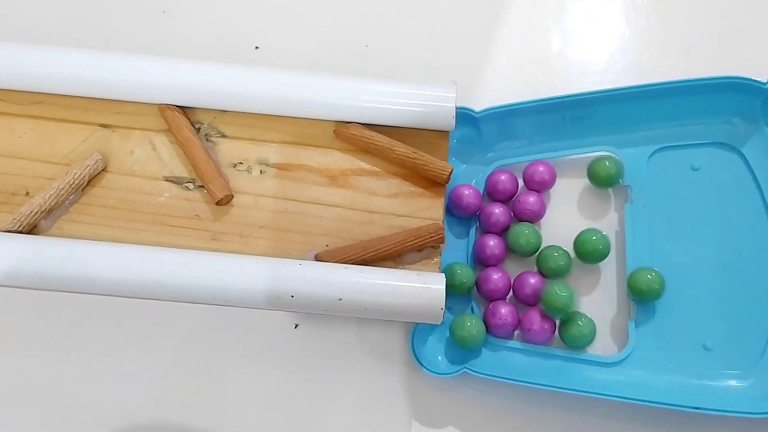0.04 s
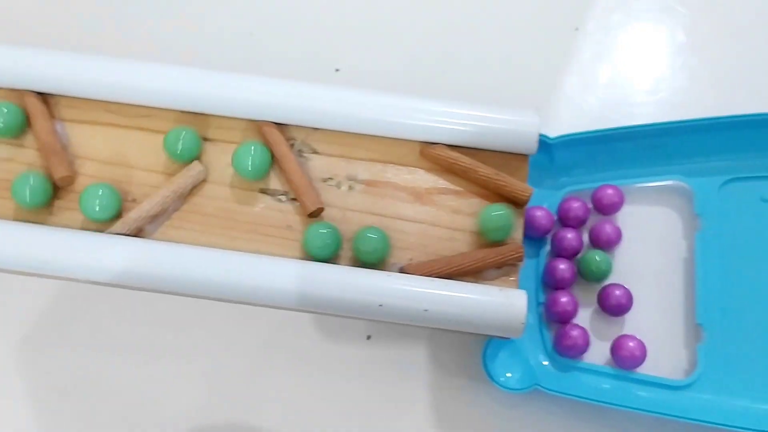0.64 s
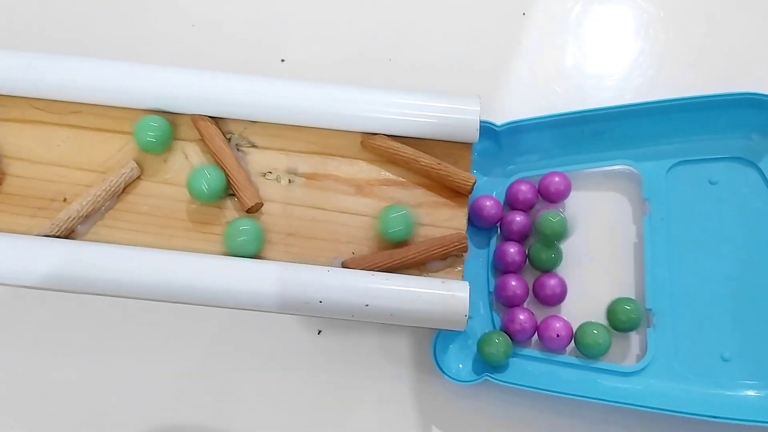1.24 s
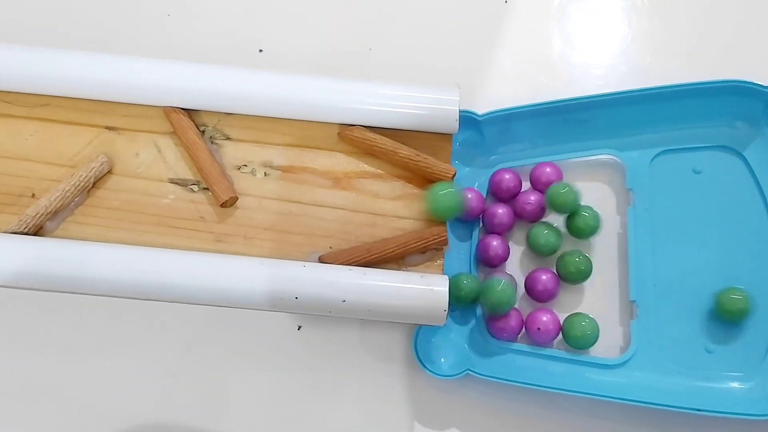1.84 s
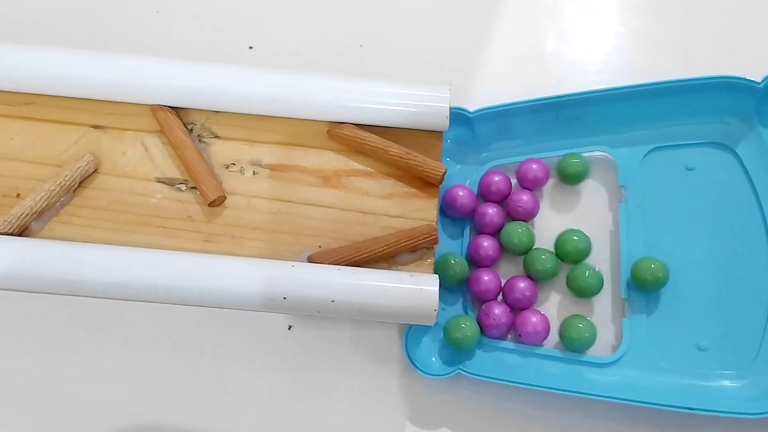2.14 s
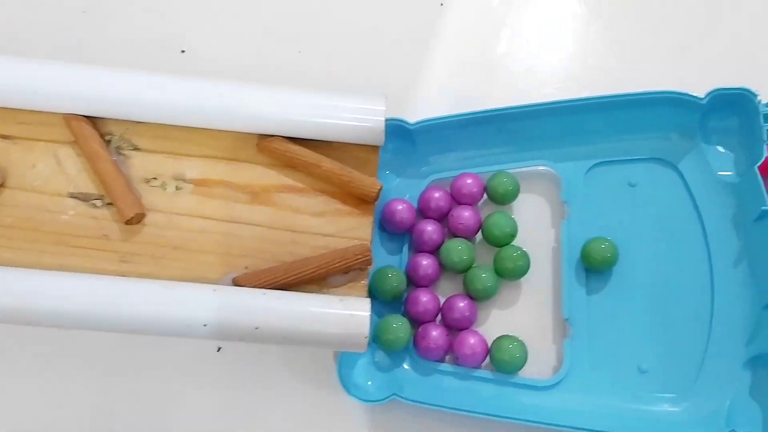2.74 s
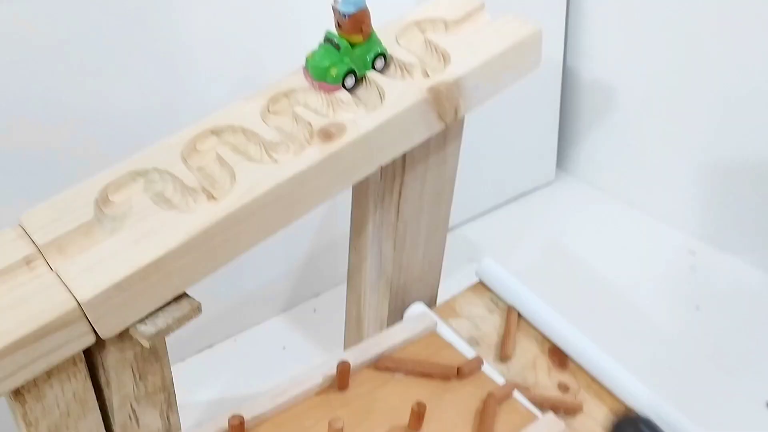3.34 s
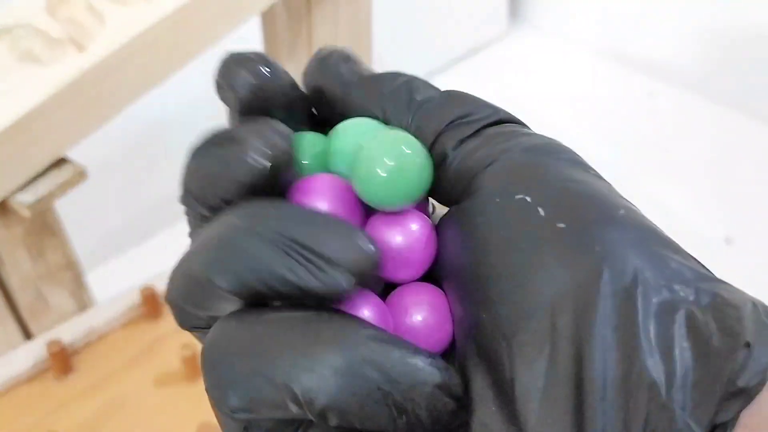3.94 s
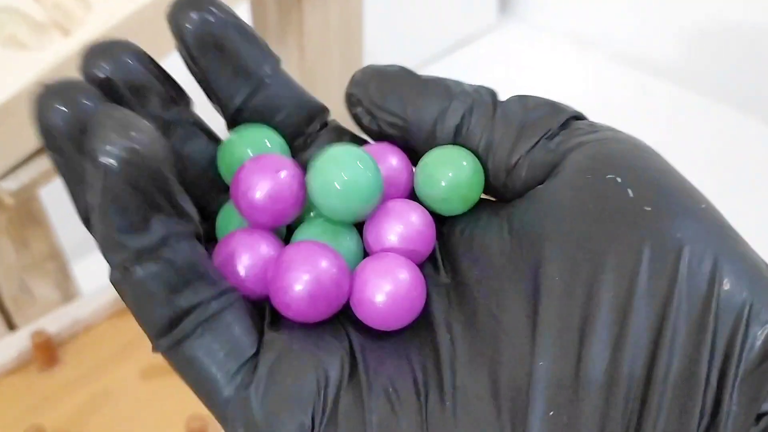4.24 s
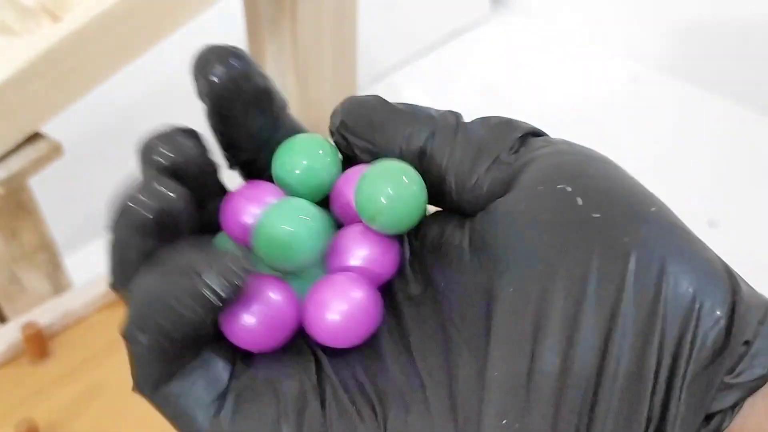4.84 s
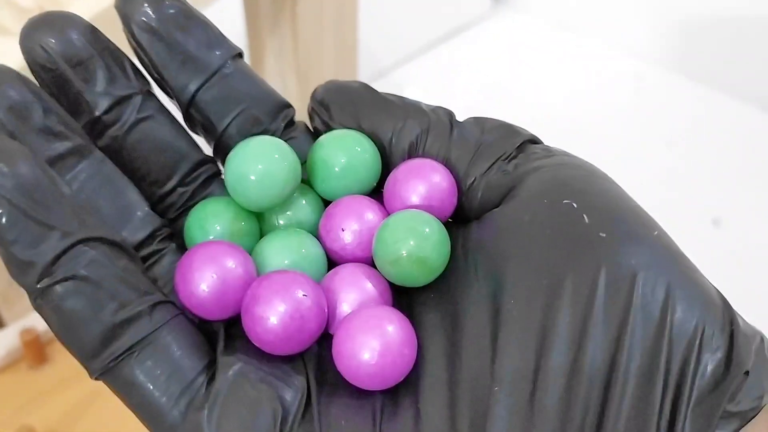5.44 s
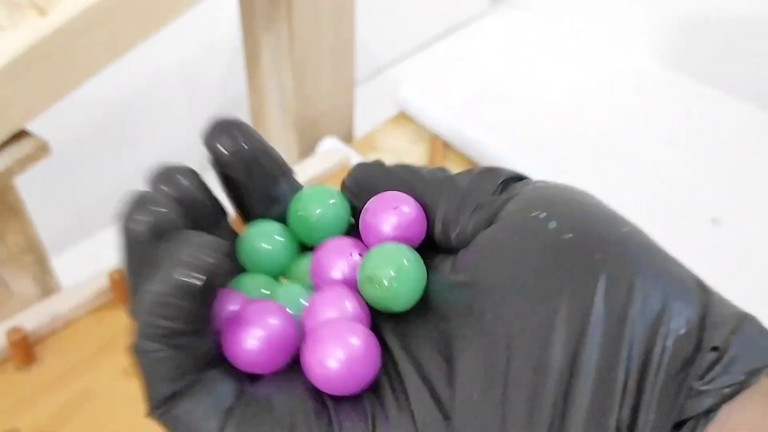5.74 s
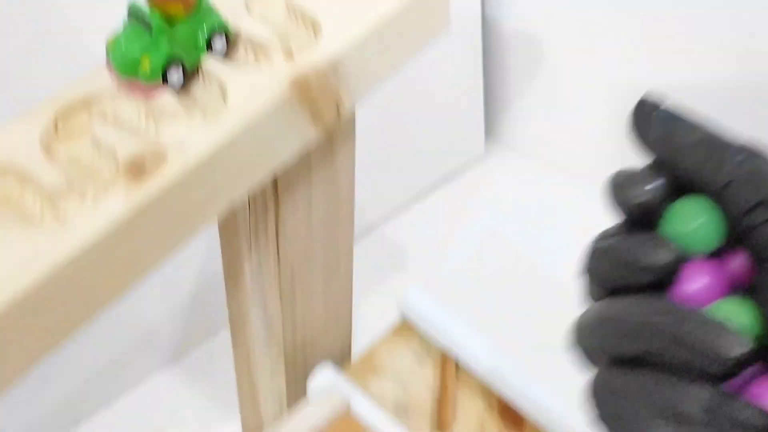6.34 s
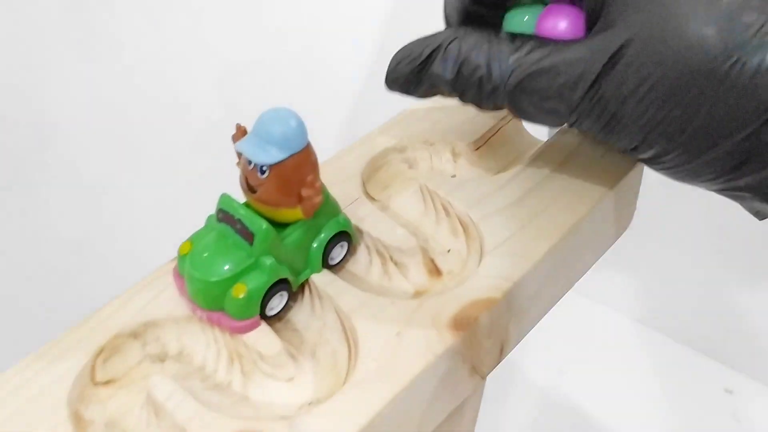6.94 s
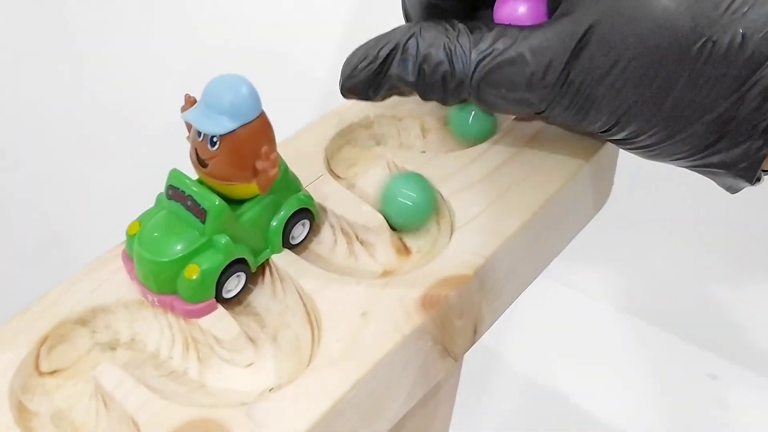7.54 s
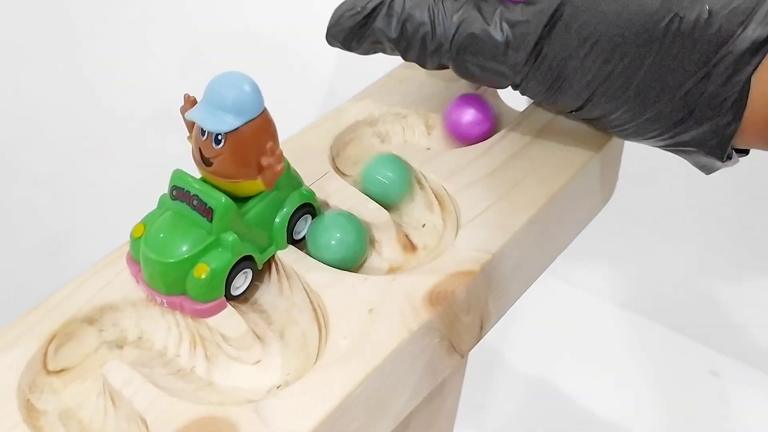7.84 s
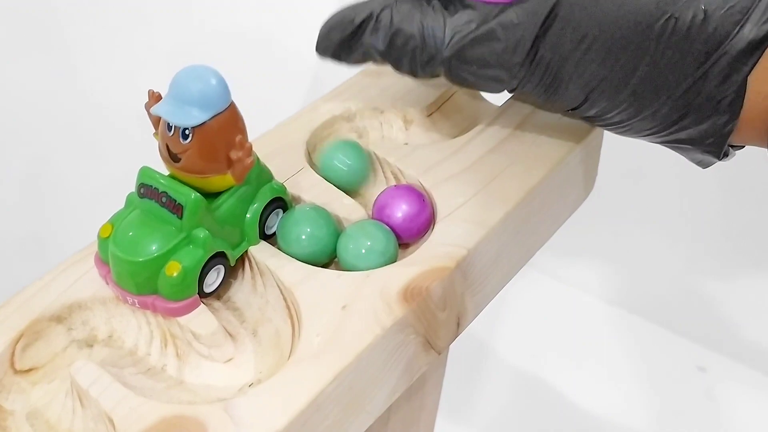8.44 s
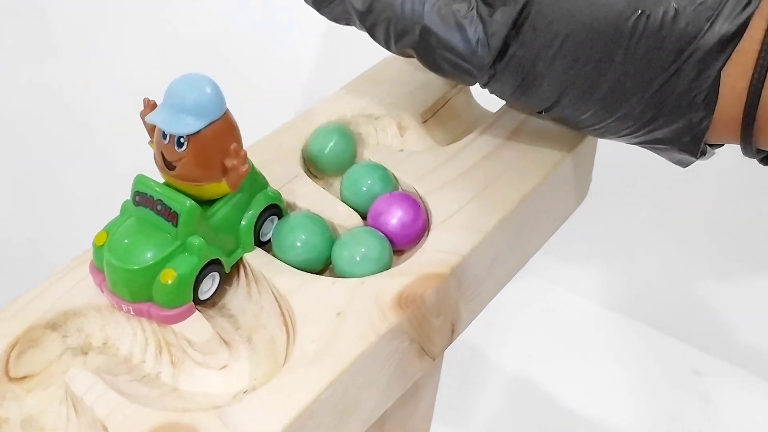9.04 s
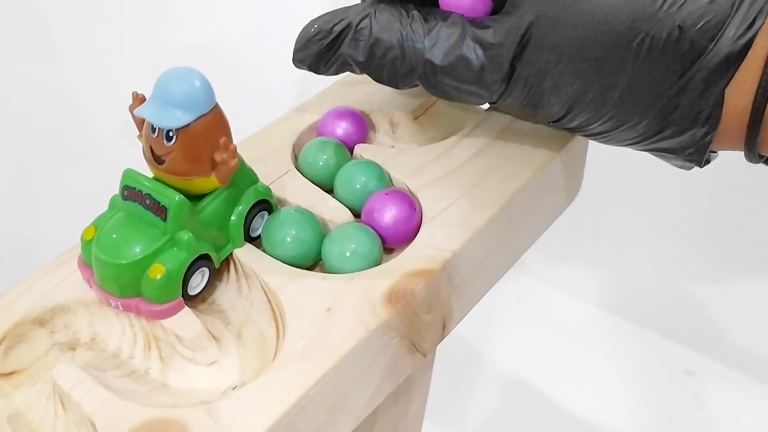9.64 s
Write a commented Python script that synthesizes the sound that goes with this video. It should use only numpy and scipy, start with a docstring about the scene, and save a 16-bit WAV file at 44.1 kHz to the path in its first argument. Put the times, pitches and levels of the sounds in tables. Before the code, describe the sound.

Glass marbles clatter down a wooden peg board into a plastic tray, click in a hand, then knock along a wooden groove.

```python
"""Glass marbles rattle down a wooden board with slanted pegs and drop into a plastic tray, close by in a
small room. A gloved hand then jostles a handful and lets them go one by one into a winding groove in a
pine beam, where they knock, roll and click against each other. Each impact is a brief force that excites
the modes of wood, plastic or glass; rolling is a dense train of tiny impacts. The scene opens with a
moment of the peg run at half speed, and a low rumble and faint hiss lie underneath."""
import sys
import numpy as np
from scipy import signal
from scipy.fft import rfft, irfft
from scipy.io import wavfile
from scipy.ndimage import uniform_filter1d, minimum_filter1d

SR = 44100
rng = np.random.default_rng(int(sys.argv[2]) if len(sys.argv) > 2 else 0)


def wav_out(sig):
    """Save sig, one row per channel (or a flat mono array), as 16-bit PCM at SR to the path in sys.argv[1]."""
    wavfile.write(sys.argv[1], SR, np.round(np.clip(np.atleast_2d(sig).T, -1, 1) * 32767).astype(np.int16))


N = 427329
TIME = np.arange(N) / SR
RING_TIME = TIME[:8192]

# Spectrum of glass striking glass. Each row: frequency in Hz, relative level in dB.
CLICK_SPECTRUM = [(200, -48), (1000, -26.5), (2000, -25), (3500, -27), (4800, -12), (6500, -4.5),
                  (8800, -0.5), (10500, -4), (11500, -14), (13000, -20), (16000, -33.5)]
# The fingers jostle the handful. Each row: start in seconds, length in seconds, relative level in dB.
JOSTLES = [(3.853, 0.059, -29.5), (4.106, 0.21, -50), (4.353, 0.043, -46), (4.712, 0.3, -37.5),
           (4.975, 0.072, -31.5), (5.198, 0.14, -43), (5.625, 0.13, -37), (7.11, 0.066, -45)]


def amp(db):
    """Amplitude ratio of a level in decibels."""
    return 10 ** (np.asarray(db) / 20)


def unit(x):
    """Normalisation to unit energy."""
    return x / np.sqrt(np.sum(x ** 2))


def steady(x):
    """Normalisation to unit rms."""
    return x / np.std(x)


def blow_level(x, db, size):
    """Normalisation of an impact to an rms level over its first size samples."""
    return amp(db) * x / np.sqrt(np.mean(x[:size] ** 2))


def curve(rows, column=1):
    """Linear interpolation of a level in dB over time, silent outside its span."""
    rows = np.array(rows)
    return np.interp(TIME, rows[:, 0], rows[:, column], left=-150, right=-150)


def add(out, s, x):
    """Superposition of x on out, starting at s seconds."""
    start = max(int(s * SR), 0)
    out[start:start + len(x)] += x[:N - start]


def response(spectrum, size=1024):
    """Minimum-phase impulse response of a magnitude spectrum, by folding the cepstrum."""
    hz, db = np.transpose(spectrum)
    freqs = np.maximum(np.fft.rfftfreq(size, 1 / SR), 1)
    magnitude = amp(np.interp(np.log(freqs), np.log(hz), db))
    cepstrum = irfft(np.log(magnitude))
    cepstrum[1:size // 2] *= 2
    cepstrum[size // 2 + 1:] = 0
    return irfft(np.exp(rfft(cepstrum)))


def through(x, impulse):
    """Convolution of a signal with an impulse response."""
    return signal.fftconvolve(x, impulse)[:len(x)]


def lowpass(x, hz, order=2):
    """Butterworth low-pass filter."""
    return signal.sosfilt(signal.butter(order, hz, fs=SR, output="sos"), x)


def band_limit(x, hz):
    """Steep elliptic low-pass filter."""
    return signal.sosfilt(signal.ellip(10, .2, 80, hz, fs=SR, output="sos"), x)


def fade(t60, t=RING_TIME):
    """Exponential decay, by 60 dB in t60 seconds."""
    return np.exp(-np.log(1000) * t / t60)


def swells(rows, attack_s, sag_db_per_s, release_db_per_s):
    """Envelope of movements: each rises linearly, sags while it lasts, then decays exponentially."""
    gain, age = np.zeros(N), TIME[:SR]
    for start, length, db in rows:
        level_db = db - sag_db_per_s * age - release_db_per_s * np.maximum(age - length, 0)
        add(gain, start, np.minimum(age / attack_s, 1) * amp(level_db))
    return gain


def burst(t60, t=RING_TIME):
    """Densely overlapping modes decay together as noise."""
    return unit(rng.standard_normal(len(t)) * fade(t60, t))


def crack(decay_s):
    """A sharp push has a smooth spectrum: a noise burst with its peaks and dips partly evened out."""
    spectrum = rfft(rng.standard_normal(len(RING_TIME)) * fade(decay_s))
    return unit(irfft(spectrum / np.abs(spectrum) ** .5) * fade(4 * decay_s))


def pings(lo_hz, hi_hz, t60, count):
    """The point of impact selects which modes ring: a few damped sines of random pitch."""
    t = RING_TIME[:4096]
    pitches = rng.uniform(lo_hz, hi_hz, (count, 1))
    rings = np.sin(2 * np.pi * pitches * t).sum(0) * fade(t60, t)
    return unit(np.pad(rings, (0, len(RING_TIME) - len(t))))


def damped_sines(modes):
    """Free vibration: each normal mode is one decaying sine."""
    return np.array([amp(db) * np.sin(2 * np.pi * hz * RING_TIME) * fade(t60) for hz, db, t60 in modes])


def ring(sines):
    """Modal superposition: each spot on a body drives its modes with different signs."""
    return unit(rng.choice([-1, 1], len(sines)) @ sines)


def contact(x, centroid_hz, knee_hz):
    """A shorter contact is brighter: the spectrum tilts above the knee toward the given power centroid."""
    spectrum, hz = rfft(x), np.fft.rfftfreq(len(x), 1 / SR)
    slope = np.log(1 + 1j * hz / knee_hz)
    for _ in range(6):
        power = np.abs(spectrum) ** 2
        shortfall = np.log(centroid_hz * power.sum() / (power @ hz))
        spectrum = spectrum * np.exp(slope * shortfall / 2)
    return unit(irfft(spectrum))


def rebound(x, gap_s, db):
    """Elastic rebound: a weaker second contact follows about gap_s later."""
    lag = int(gap_s * rng.uniform(.6, 1.4) * SR)
    return x + amp(db) * np.pad(x, (lag, 0))[:len(x)]


def bumps(per_s):
    """Shot noise: tiny impacts of random time, sign and size, at unit rms."""
    present = rng.random(N) < per_s / SR
    size_db = 5 * np.clip(rng.standard_normal(N), -2, 2)
    return steady(present * rng.choice([-1, 1], N) * amp(size_db))


def background():
    """Filtered noise: a low rumble that swells unevenly, and a faint hiss."""
    # Each row: time in seconds, mean rumble level in dB, hiss level in dB.
    levels = [(0, -52, -78), (2.6, -48.5, -68.5), (3.2, -45, -57.5), (3.65, -48.5, -54.5),
              (3.9, -58, -65.5), (6.2, -58, -60), (6.7, -51, -53), (7.6, -52, -58), (9.69, -53.5, -55)]
    # Spectra of the two noises. Each row: frequency in Hz, relative level in dB.
    rumble_spectrum = [(10, -4.5), (22, 5), (50, -12), (75, -11.5), (120, -17.5), (220, -15), (530, -31.5),
                       (900, -42.5), (1500, -43.5)]
    hiss_spectrum = [(200, 3.5), (500, 7.5), (1200, -3), (3000, -6), (5500, -6), (7500, -3), (10000, -2),
                     (12500, -12.5), (16000, -12.5)]
    rumble = steady(through(rng.standard_normal(N), response(rumble_spectrum, size=8192)))
    swell_db = 2.5 * steady(lowpass(rng.standard_normal(N), 6))
    hiss = steady(through(rng.standard_normal(N), response(hiss_spectrum)))
    return amp(curve(levels) + swell_db) * rumble + amp(curve(levels, column=2)) * hiss


def peg_run():
    """Impact excitation: marbles crack against the pegs, ring wood and plastic, and rumble onward."""
    # Hits on pegs and tray. Each row: start in seconds, relative level in dB, spectral centroid in Hz.
    clacks = [(0.4146, -36.5, 3200), (0.437, -40, 3000), (0.462, -33.5, 4200), (0.4898, -27.5, 3440),
              (0.515, -15.5, 5260), (0.518, -13, 5210), (0.546, -21, 4720), (0.5751, -8, 6950),
              (0.677, -15, 4780), (0.703, -34, 4000), (0.7134, -11.5, 5220), (0.7341, -24.5, 3660),
              (0.852, -22, 3600), (0.8091, -11, 5620), (0.8729, -12, 3900), (0.9431, -17.5, 4850),
              (0.9823, -8.5, 5880), (1.0323, -27.5, 3650), (1.0523, -10.5, 5840), (1.093, -10.5, 4210),
              (1.1402, -26.5, 3350), (1.1637, -13.5, 5040), (1.2084, -14.5, 6130), (1.263, -26.5, 5490),
              (1.2688, -12, 6060), (1.3332, -16.5, 6110), (1.3437, -13, 4600), (1.382, -19.5, 4480),
              (1.4, -19.5, 5770), (1.4489, -11.5, 5260), (1.5482, -13, 4660), (1.5922, -19.5, 3910),
              (1.6772, -19, 4470), (1.7258, -7.5, 6030), (1.8008, -6.5, 5560), (1.8466, -22, 3980),
              (1.9059, -16, 5160), (1.955, -10.5, 6180), (1.9687, -8, 5570), (1.9845, -23, 5670),
              (2.014, -16, 5000), (2.0363, -15, 4600), (2.06, -25, 4690), (2.084, -24, 3600),
              (2.117, -10, 4600), (2.1563, -23, 3310), (2.213, -20.5, 5330), (2.242, -27, 2800),
              (2.2743, -24.5, 9700), (2.305, -31, 6800), (2.428, -22.5, 2480), (2.4652, -34, 2130),
              (2.5353, -37.5, 2340)]
    # Modes of board and tray. Each row: frequency in Hz, relative level in dB, 60 dB decay in seconds.
    board_modes = [(388, -3, .11), (616, -4, .07), (790, -5, .07), (1180, 0, .09), (1300, 0, .09),
                   (1370, 0, .11), (1707, -3, .08), (2315, -2, .12), (2640, -2, .11), (2890, 0, .09),
                   (3440, -4, .1), (4436, -3, .13)]
    # Spectra of a clack and of the rolling. Each row: frequency in Hz, relative level in dB.
    clack_spectrum = [(100, -41), (200, -13), (450, -6), (800, -1), (1250, 1), (2000, 1.5), (3000, -1),
                      (4500, -1.5), (6500, 1.5), (9000, 5), (11000, -1), (13000, -12.5), (15500, -19),
                      (17000, -48)]
    roll_spectrum = [(59, -47.5), (100, -30.5), (196, -8), (300, -18), (513, -10), (633, -1), (800, -5),
                     (1000, -12.5), (1210, 0.5), (1700, -9.5), (2580, -6.5), (4840, -10.5), (6910, -14),
                     (9260, -5.5), (15000, -25.5)]
    # Rolling on the board. Each row: time in seconds, relative level in dB.
    roll_levels = [(0.41, -22.5), (0.5, -30), (0.62, -25.5), (0.79, -27.5), (0.88, -20), (0.96, -31.5),
                   (1.02, -24), (1.14, -23), (1.24, -27.5), (1.36, -27.5), (1.52, -30), (1.7, -32.5),
                   (1.78, -28), (1.93, -22.5), (2.05, -24.5), (2.11, -33), (2.6, -78)]
    out, body, sines = np.zeros(N), response(clack_spectrum), damped_sines(board_modes)
    clatter_envelope = fade(.027, np.maximum(RING_TIME - .005, 0))  # holds for 5 ms, then decays
    for s, db, hz in clacks:
        snap = crack(.003) + amp(-6) * pings(896, 10000, .033, count=8)
        clatter = unit(crack(.38) * clatter_envelope)
        blow = rebound(snap, gap_s=.0033, db=-8.5)
        blow += amp(2.5) * clatter + amp(-2.5) * unit(lowpass(clatter, 3300))
        blow += amp(-8.5) * ring(sines) + amp(-3.5) * pings(1100, 4200, .03, count=6)
        clack = contact(through(blow, body), hz, knee_hz=1700)
        add(out, s, blow_level(clack, db + .16, size=309))
    grain = steady(through(bumps(per_s=1200), crack(.009)))
    wood = steady(through(bumps(per_s=830), ring(sines)))
    excitation = amp(-8) * grain + amp(-23.5) * wood + touches(until_s=roll_levels[-1][0])
    rolling = through(excitation, unit(response(roll_spectrum)))
    # After each clack the marble skitters on, which briefly adds to the power of the rolling.
    skitters = [(s, .023, db - 19.5) for s, db, _ in clacks]
    skitter = swells(skitters, attack_s=.019, sag_db_per_s=12, release_db_per_s=370)
    return out + np.hypot(amp(curve(roll_levels) - 1.5), skitter) * rolling


def touches(until_s, per_s=170):
    """Light random impacts further up the board each excite a few woody and a few glassy modes."""
    out = np.zeros(N)
    for s in rng.uniform(0, until_s, size=int(per_s * until_s)):
        rings = pings(650, 3200, .035, count=3) + amp(3) * pings(3200, 10500, .028, count=4)
        gain = amp(17 + 1.8 * rng.standard_normal())
        add(out, s, gain * (amp(-3) * rings + amp(-2) * crack(.005)))
    return out


def tick(hz, body):
    """Stiff glass makes a very short contact: a pulse centred near hz, with a few brief rings."""
    ping = unit(np.sin(2 * np.pi * hz * RING_TIME) * RING_TIME * fade(.003))
    rings = pings(3600, 11500, .009, count=5)
    snap = rebound(crack(.0025), gap_s=.0009, db=-6) + amp(-13) * burst(.035) + amp(-5) * rings
    return contact(unit(through(snap, body)) + amp(-6) * ping, hz, knee_hz=4700)


def glass_clicks():
    """Elastic collisions of glass on glass: each gives a tick, two weaker rebounds and a lower clink."""
    # Collisions on the board, in the hand and in the groove. Each row: start in seconds,
    # relative tick level in dB, tick frequency in Hz, relative clink level in dB.
    collisions = [(0.4857, -30, 7300, -36), (0.642, -23, 7300, -39), (0.8614, -30, 7400, -43),
                  (0.9127, -24, 7940, -38), (1.309, -25.5, 8340, -40), (1.4175, -27, 8000, -33),
                  (1.6243, -26, 9700, -36), (1.872, -18, 9400, -27), (1.8875, -27, 8400, -32),
                  (1.9435, -20, 7200, -25), (2.028, -18, 8600, -24), (2.1827, -28, 8800, -47),
                  (3.7787, -35, 7850, -44.5), (3.8047, -28, 8300, -40), (3.8602, -18.5, 8100, -39.5),
                  (3.8971, -19, 9200, -38), (3.9015, -22.5, 9400, -52), (3.9093, -22.5, 9500, -41),
                  (3.9389, -20.5, 8800, -42), (3.9495, -23, 7840, -41), (3.9555, -23, 7760, -38),
                  (4.0375, -35, 7930, -50), (4.0416, -26, 7450, -44), (4.0877, -30.5, 7700, -47),
                  (4.1066, -37, 7450, -58), (4.127, -33, 6950, -60), (4.1388, -30.5, 8040, -49),
                  (4.1599, -34, 8000, -66), (4.1729, -22, 8300, -48), (4.1806, -27, 7500, -60),
                  (4.199, -23, 7800, -56), (4.2335, -28, 8500, -71), (4.2449, -30.5, 8540, -61),
                  (4.2523, -25, 8620, -64.5), (4.2833, -32.5, 8600, -49), (4.3537, -32.5, 7460, -48),
                  (4.3722, -36, 8000, -51), (4.5315, -26, 7360, -44), (4.5441, -21, 8500, -39),
                  (4.6004, -23.5, 8650, -40), (4.6188, -24, 8800, -37.5), (4.7008, -22, 8050, -53),
                  (4.7039, -23.5, 7600, -45), (4.7293, -25, 7400, -61), (4.7505, -42, 8700, -40),
                  (4.76, -20, 8900, -55), (4.772, -23, 9300, -43), (4.779, -18, 9300, -42),
                  (4.8079, -22, 8540, -45), (4.8246, -16, 8300, -52), (4.8315, -24, 8700, -43),
                  (4.882, -41, 7500, -57), (4.8899, -22.5, 7340, -50), (4.9033, -40, 7500, -46),
                  (4.9239, -32, 8700, -43), (4.9383, -24, 7000, -47), (4.9781, -23, 8750, -41.5),
                  (4.9958, -27.5, 8300, -41.5), (5.0231, -20.5, 9060, -52), (5.0365, -23, 8500, -47),
                  (5.079, -26, 7900, -40), (5.1032, -53, 7500, -57), (5.1135, -25.5, 7550, -42.5),
                  (5.1502, -34.5, 7800, -55), (5.1725, -40.5, 7350, -45), (5.1993, -18.5, 8800, -43),
                  (5.2109, -21.5, 8500, -44), (5.2244, -30, 8000, -44), (5.2555, -20, 8740, -35.5),
                  (5.2665, -26, 8080, -41), (5.2971, -51, 8800, -64), (5.3154, -35, 8900, -59),
                  (5.5631, -32.0, 8800, -57.5), (5.6144, -28, 8600, -58), (5.6301, -28.5, 8300, -50),
                  (5.6415, -24.5, 8500, -57.5), (5.6621, -29, 7350, -46), (5.6806, -23.5, 8960, -48),
                  (5.693, -32, 8100, -56), (5.7112, -22, 9100, -58), (5.7228, -20, 8900, -60),
                  (5.7494, -30.5, 8450, -56), (5.829, -28.5, 6680, -43), (5.8983, -19.5, 10200, -46),
                  (5.9157, -14, 8900, -36.5), (5.9335, -28, 8100, -38), (6.0401, -24.5, 8700, -34.5),
                  (6.1781, -28, 8300, -34), (6.2479, -18.5, 7240, -29), (6.2527, -16, 7700, -22),
                  (6.2988, -40, 6500, -34), (6.9753, -39, 9070, -53), (7.081, -26.5, 9100, -41),
                  (7.471, -32.5, 5800, -45), (7.6953, -27, 7800, -34), (7.9791, -16.5, 7940, -33.5),
                  (8.1534, -20.5, 8550, -55), (8.2939, -37.5, 8300, -55), (8.4514, -17.5, 8000, -39),
                  (8.472, -29, 7160, -46), (8.4822, -25.5, 7960, -40), (9.0648, -18, 7800, -35),
                  (9.0976, -25, 8100, -42), (9.2001, -27, 6970, -32), (9.5094, -17, 8600, -36),
                  (9.5269, -29, 7800, -46)]
    # Spectrum of the clink. Each row: frequency in Hz, relative level in dB.
    clink_spectrum = [(200, -46), (1200, -15), (2200, -2), (3300, -1.5), (4600, 7.5), (6000, 1),
                      (9000, -12), (16000, -37)]
    out, tick_body, clink_body = np.zeros(N), response(CLICK_SPECTRUM), response(clink_spectrum)
    for s, db, hz, clink_db in list(collisions) + nudges():
        add(out, s - .0002, blow_level(tick(hz, tick_body), db - .2, size=132))
        for later_s in np.cumsum(.005 * rng.uniform(.4, 1.6, size=2)):
            rebound_db = db - 11.5 + 2.5 * rng.uniform(-1, 1)
            add(out, s + later_s, blow_level(through(crack(.005), tick_body), rebound_db, size=132))
        rings = amp(-2) * pings(4000, 6800, .011, count=3) + pings(1900, 3900, .013, count=4)
        clink = through(amp(-8.5) * crack(.014) + rings + amp(3) * burst(.035), clink_body)
        add(out, s, blow_level(clink, clink_db - 1, size=309))
    return out


def tray_thumps(flex_s=.026, boom_hz=192):
    """Plate flexure: a landing pushes the tray bottom down, and it booms at a pitch set by the spot."""
    # Heavy landings. Each row: time in seconds, level of the push in dB, peak of the boom in dB.
    landings = [(0.587, -24, -34), (0.82, -40, -41), (0.886, -49, -35.5), (0.994, -30, -35),
                (1.063, -31.5, -44.5), (1.281, -41, -45.5), (1.349, -52, -33), (1.463, -36, -29.5),
                (1.559, -55.5, -35), (1.738, -36, -36), (1.815, -39, -31), (1.98, -30.5, -37.5),
                (2.131, -52.5, -35)]
    out = np.zeros(N)
    flex = -np.sin(np.pi * np.minimum(RING_TIME / flex_s, 1)) ** 2
    flex -= lowpass(flex, 4, order=1)
    for s, push_db, boom_db in landings:
        hz = boom_hz * rng.uniform(.9, 1.1)
        boom = np.sin(2 * np.pi * hz * RING_TIME) * RING_TIME * fade(.043)
        add(out, s - flex_s / 2, amp(push_db) * flex + amp(boom_db) * boom / boom.max())
    return out


def buzzes(first_gap_s=.0013, restitution=.92, fall_db_per_s=431, count=32):
    """Each bounce loses energy, so a marble settles against its neighbour ever faster and more weakly."""
    # Each row: start in seconds, initial level in dB.
    settlings = [(1.99, -26.5), (2.025, -26.5), (2.055, -30), (3.803, -36), (3.861, -32), (4.201, -34.5),
                 (5.918, -33), (6.041, -34), (6.254, -55)]
    out, body = np.zeros(N), response(CLICK_SPECTRUM)
    for s, db in settlings:
        gaps = first_gap_s * restitution ** np.arange(count) * rng.uniform(.6, 1.4, count)
        for age in np.cumsum(gaps):
            bounce = through(crack(.0012), body)
            add(out, s + age, blow_level(bounce, db - fall_db_per_s * age, size=132))
    return out


def hand_chatter():
    """Many faint contacts among the jostled marbles merge into glassy shot noise."""
    ticks = through(bumps(per_s=110), crack(.012))
    chatter = steady(through(ticks, response(CLICK_SPECTRUM)))
    return amp(-8) * chatter * swells(JOSTLES, attack_s=.0042, sag_db_per_s=5.5, release_db_per_s=640)


def nudges(per_s=17, count=24):
    """Light collisions at irregular moments of each jostle, as rows for glass_clicks."""
    rows = []
    for start, length, jostle_db in JOSTLES:
        ages = (np.arange(count) + rng.random(count)) / per_s
        levels = jostle_db + 6 + 2 * rng.standard_normal(count)
        pitches = rng.uniform(6500, 9800, count)
        rows += [(start + age, db, hz, db - 11)
                 for age, db, hz in zip(ages, levels, pitches) if age < length]
    return rows


def bend(x, delay_at_1khz_s=.002174):
    """Dispersion: high bending waves travel faster than low ones, so a knock sweeps quickly downward."""
    hz = np.maximum(np.fft.rfftfreq(len(x), 1 / SR), 1)
    phase = 4 * np.pi * delay_at_1khz_s * np.sqrt(1000 * hz)
    return irfft(rfft(x) * np.exp(-1j * phase))


def groove():
    """Knocks excite the pine beam's modes; rolling over the bumps of the carving drives the same modes."""
    # Knocks on the beam. Each row: start in seconds, level in dB, spectral centroid in Hz.
    knocks = [(6.507, -46.5, 1720), (6.611, -45, 1870), (6.7287, -47.5, 2700), (7.0915, -30, 730),
              (7.1042, -20, 744), (7.1152, -16.5, 1120), (7.1208, -17.5, 1310), (7.128, -16, 1330),
              (7.288, -32, 606), (7.3179, -32, 590), (7.332, -38, 650), (7.351, -39, 694),
              (7.368, -34, 715), (7.381, -37, 780), (7.3898, -31, 830), (7.403, -22, 830),
              (7.422, -46, 890), (7.4413, -28, 755), (7.46, -21.5, 850), (7.471, -17.5, 1590),
              (7.491, -34, 1150), (7.523, -34, 1060), (7.626, -33, 920), (7.6821, -25, 1090),
              (7.7875, -19.5, 1100), (7.808, -41, 1050), (8.0048, -21, 1070), (8.0626, -18.5, 1290),
              (8.0862, -40, 1090), (8.1171, -22, 1840), (8.1437, -31, 1630), (8.3807, -39, 790),
              (8.7738, -31, 710), (8.7905, -27.5, 1190), (8.804, -28, 2010), (9.005, -35.5, 1050),
              (9.2365, -28.5, 930), (9.3246, -12.5, 3000), (9.346, -41, 2700), (9.353, -41, 2700),
              (9.6347, -29.5, 1120), (9.6437, -21.5, 2210), (9.6487, -15.5, 2950)]
    # Modes of the beam. Each row: frequency in Hz, relative level in dB, 60 dB decay in seconds.
    beam_modes = [(285, -17, .15), (385, -15, .15), (471, -11, .2), (718, -12, .17), (784, -10, .2),
                  (838, -7, .2), (890, -4, .22), (1109, 2, .2), (1152, -3, .3), (1985, -10, .12),
                  (2160, -14, .2), (2750, -9, .12), (2855, -8, .18), (3185, -5, .08), (3535, -10, .09)]
    # Spectra of a knock and of the rolling. Each row: frequency in Hz, relative level in dB.
    knock_spectrum = [(80, -29), (200, -6.5), (300, -4.5), (470, 1), (590, -7.5), (740, 5), (900, 6),
                      (1120, 5.5), (1300, -1), (1700, -5.5), (2000, -1.5), (2400, -6.5), (2800, 4),
                      (2970, -14), (3180, 6), (3400, -5), (3540, -2), (3850, -12), (4400, -17.5),
                      (6000, -37), (8500, -17.5), (14000, -70)]
    roll_spectrum = [(59, -44), (100, -14), (274, -9.5), (418, -4.5), (493, 5), (603, -12.5), (765, 0),
                     (1170, -10), (1400, -14), (2180, -16), (3260, -35), (8000, -53)]
    # Rolls from bend to bend. Each row: start in seconds, length in seconds, relative level in dB.
    rolls = [(7.29, 0.13, -38.5), (7.52, 0.2, -38.5), (7.83, 0.42, -46.5), (8.31, 0.17, -48.5),
             (8.8, 0.32, -47.5), (9.24, 0.31, -47), (9.65, .04, -45)]
    out, body, sines = np.zeros(N), response(knock_spectrum, size=2048), damped_sines(beam_modes)
    for s, db, hz in knocks:
        push = signal.unit_impulse(len(RING_TIME)) + amp(-1.5) * crack(.038)
        thud = unit(bend(through(push, body))) + amp(-8.5) * ring(sines)
        thud = unit(lowpass(thud, 2 * hz))  # a soft, long contact leaves the high modes at rest
        tap = amp(-22) * unit(lowpass(crack(.0032), 4500))
        add(out, s - .0005, blow_level(contact(thud + tap, hz, knee_hz=400), db, size=309))
    grain = steady(lowpass(through(bumps(per_s=300), response(roll_spectrum)), 1900))
    wood = steady(through(grain, ring(sines)))
    envelope = swells(rolls, attack_s=.0065, sag_db_per_s=5.2, release_db_per_s=350)
    return out + envelope * (amp(2) * grain + amp(-6) * wood)


def spins():
    """Friction: a marble spinning after a hard knock catches the grain and excites high beam resonances."""
    # Each row: start in seconds, length in seconds, level in dB.
    rasps = [(7.535, 0.17, -43), (9.335, 0.17, -41.5), (9.655, 0.035, -41)]
    # Upper resonances of the beam. Each row: frequency in Hz, relative level in dB.
    rasp_spectrum = [(500, -27), (1600, -14), (2100, 6), (2450, -7), (2800, 9), (2970, -8), (3200, 2),
                     (3550, -10), (4100, -7), (4900, -14), (9000, -48)]
    rasp = steady(through(bumps(per_s=700), response(rasp_spectrum)))
    return rasp * swells(rasps, attack_s=.0075, sag_db_per_s=38, release_db_per_s=280)


def reflections(wall_delay_s=.016):
    """Room impulse response: echoes from table and frame, then near walls, then a darkening tail."""
    # Spectrum of the reflected sound. Each row: frequency in Hz, relative level in dB.
    room_spectrum = [(60, -7.5), (300, 1.5), (1000, -3), (3000, -2.5), (8000, -4.5), (15000, 3.5)]
    t = TIME[:SR * 3 // 4]
    tail = unit(lowpass(burst(.51, t), 9800, order=6)) + amp(3.5) * burst(.28, t)
    arrival = np.clip((t - wall_delay_s) / .003, 0, 1)
    near = burst(.07, t) * (1 - fade(.0013, t))
    walls = unit(burst(.067, t) * arrival)
    echoes = amp(-7) * near + amp(-18.5) * walls + amp(-9.5) * unit(tail * arrival)
    return np.convolve(echoes, response(room_spectrum))


def room(x, size=16384):
    """Reflection paths change as the marbles move, so each overlapping block has its own reverberation."""
    out, window = np.zeros(N), np.sqrt(signal.get_window("hann", size))
    for start in range(0, N, size // 2):
        piece = x[start:start + size]
        add(out, start / SR, signal.fftconvolve(piece * window[:len(piece)], reflections()))
    return out


def half_speed(x, from_s):
    """Stretching time by two halves every frequency: the sound from from_s onward, an octave down."""
    stretched = signal.resample_poly(x[int(from_s * SR):][:N // 2 + 1], 2, 1)[:N]
    return band_limit(stretched, 8200)


def scene():
    """Direct and reflected sound add; the opening runs at half speed, and the sound stops dead twice."""
    # Brief silences. Each row: start in seconds, end in seconds.
    pauses = [(0.378, 0.410), (2.191, 2.211)]
    board = peg_run()
    beam = groove() + spins()
    glass = hand_chatter() + glass_clicks() + buzzes()
    echoes = room(amp(-1) * board + amp(-2) * beam + glass)
    sound = board + beam + glass + echoes + tray_thumps() + background()
    opening = amp(-.9) * half_speed(sound, from_s=1.9825)
    sound = np.where(TIME < pauses[0][1], opening, sound)
    silent = sum((TIME > start) & (TIME < end) for start, end in pauses)
    return (sound * uniform_filter1d(1. - silent, size=100))[None]


def record(dry):
    """Peak limiting: the gain dips briefly at the sharpest peaks; the treble above 16 kHz is then cut."""
    gain = np.minimum(1, .93 / (np.abs(dry) + 1e-9))
    gain = uniform_filter1d(minimum_filter1d(gain, size=150), size=150)
    return band_limit(dry * gain, 16000)


dry = scene()
out = record(dry)
wav_out(out)
```